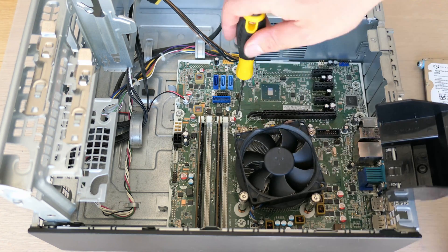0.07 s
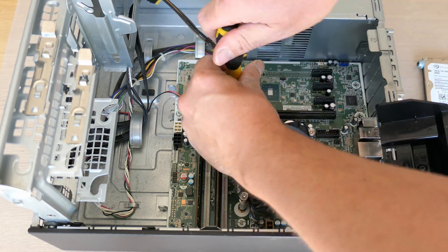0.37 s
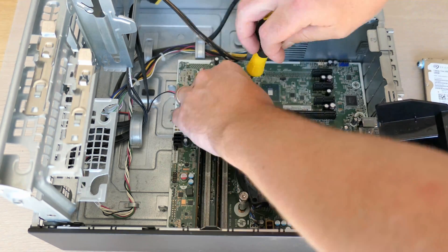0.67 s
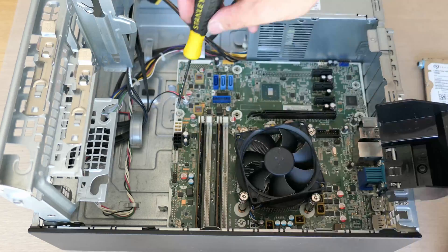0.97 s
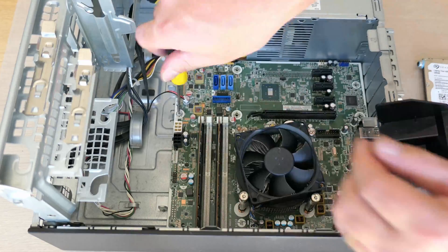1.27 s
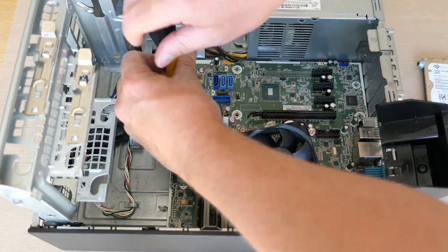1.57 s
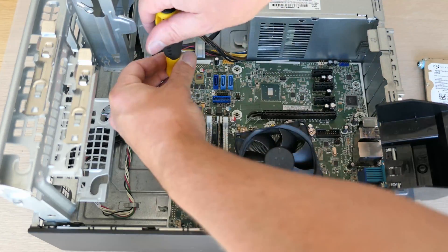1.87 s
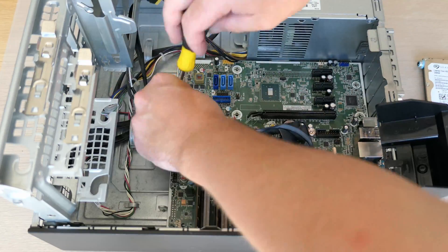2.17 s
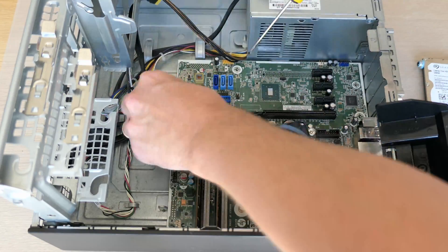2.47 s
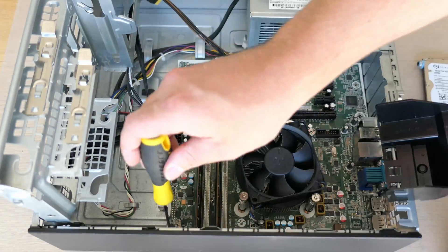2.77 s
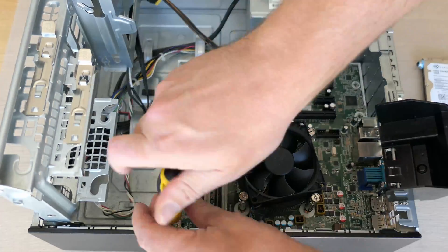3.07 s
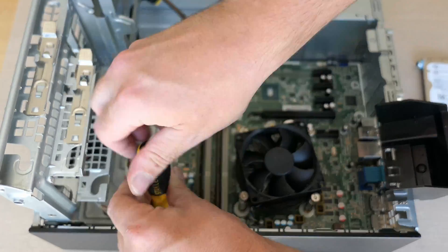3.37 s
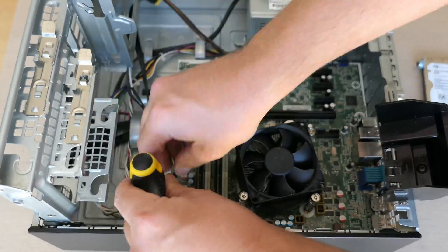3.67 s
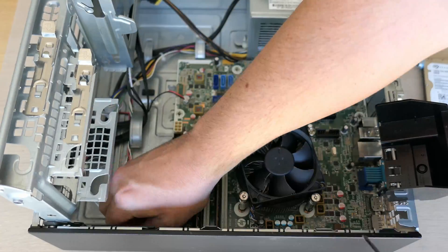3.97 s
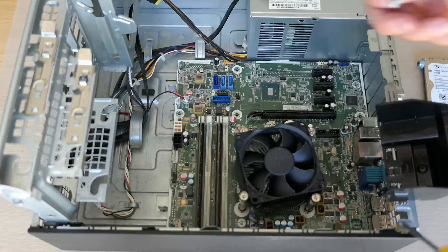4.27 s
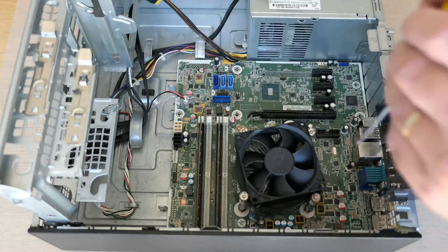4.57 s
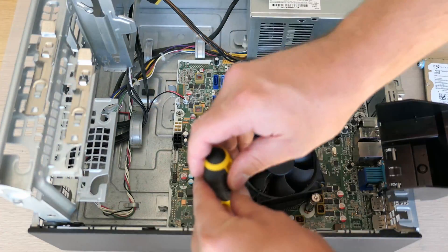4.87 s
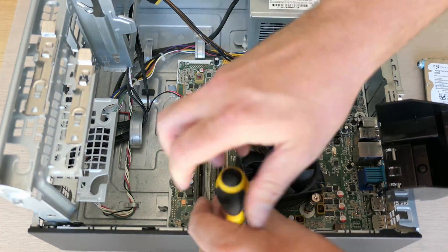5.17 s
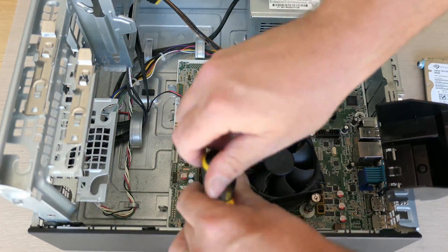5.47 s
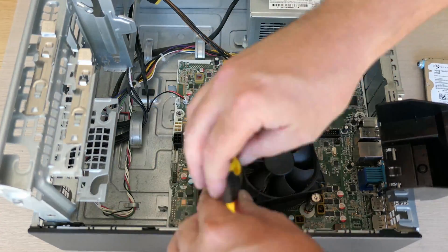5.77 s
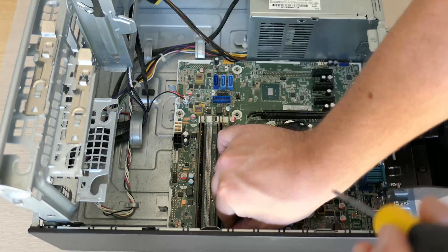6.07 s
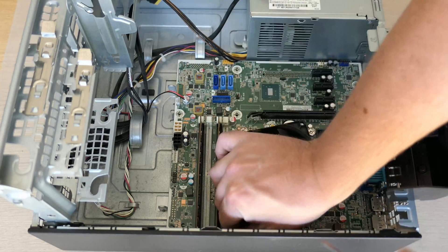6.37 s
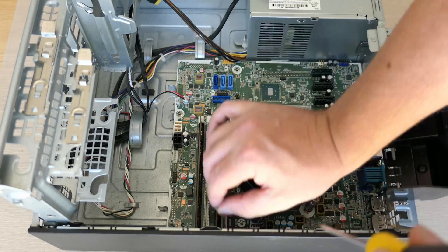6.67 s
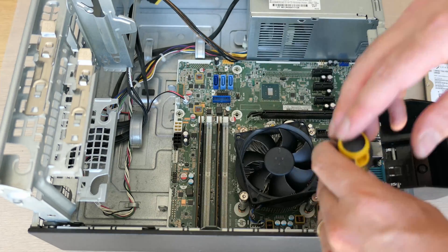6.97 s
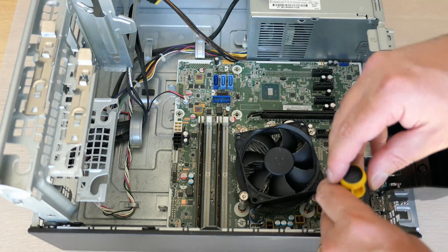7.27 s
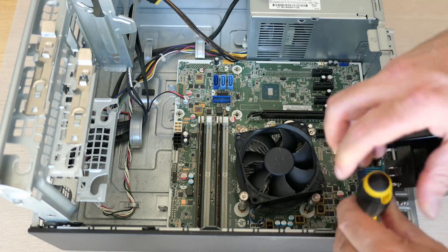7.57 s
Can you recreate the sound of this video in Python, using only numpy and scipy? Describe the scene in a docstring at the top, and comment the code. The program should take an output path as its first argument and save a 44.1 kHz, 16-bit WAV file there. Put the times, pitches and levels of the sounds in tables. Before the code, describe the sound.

A screwdriver works on small screws in an open steel computer case, close to the microphone over a low room hush. From the start its tip scrapes and snaps in a screw head, with sharp clicks around 0.2 and 0.6 seconds. More clicks follow after 1 second, threads rub softly from 1.4, and the loosened circuit board rattles at about 1.6. After another snap at 2 seconds, fingers pick at a loose screw with light ticks. A new run of scrapes and clicks starts near 2.7 seconds and ends in a rattle at 3.7. Following a lull with faint ticks, the tool resumes from 4.5 to 5.8 seconds, with a third rattle at 5.1. Soft rubbing and small ticks follow, and a screw pings faintly at 6.5. From 7.3 seconds the tip scrapes and clicks sharply on the last screw.

```python
"""A quiet room, the camera's stereo microphone close to an open steel computer case. Over a low hush a
screwdriver backs five small screws out of the board. Its tip scrapes and snaps in the first head, each
touch a cluster of tiny impacts sounding through board and case; then fingers pick at loose parts with
bright ticks. From 1.4 s threads rub, and three times the freed board rattles. At 6.5 s a loose screw
pings, and the tip moves on to the last head."""
import sys
import numpy as np
from scipy import signal
from scipy.fft import rfft, irfft, next_fast_len
from scipy.io import wavfile
from scipy.ndimage import uniform_filter1d, map_coordinates

SR = 44100
rng = np.random.default_rng(int(sys.argv[2]) if len(sys.argv) > 2 else 0)


def int16_out(signal):
    """Quantize to a 16-bit WAV file."""
    q = np.round(np.clip(np.atleast_2d(signal).T, -1, 1) * 32767)
    wavfile.write(sys.argv[1], SR, q.astype(np.int16))


N = 335601

# room background, as a spectral density: freq_hz, level_db
HUSH_SPECTRUM = [(25, -39.5), (80, -23), (140, -5.5), (400, -5.5), (900, -12.5), (1300, -17), (3500, -31),
                 (12000, -31.5), (16000, -45)]
# likeness of that background in left and right: freq_hz, correlation
HUSH_LIKENESS = [(100, 0.71), (4000, 0.097)]
# the room's decay: freq_hz, t60_s
ROOM_DECAY = [(150, .38), (1000, 0.22), (14000, 0.27)]
# the room's answer at the microphone: freq_hz, level_db
ROOM_LEVEL = [(150, -1.5), (1000, -6), (14000, -14)]
# modes of board and case: pitch_hz, width_hz, then drive_db from each of the five screws
CASE_MODES = [(142, 8.5, -6, -1, -4, -5, 6.5), (217, 50, -4.5, -6.5, -3.5, -8, -3),
              (321.9, 30, -0.5, 0, 4.5, 3.5, -5.5), (436, 31, -20.5, 0, -11, -23, 2),
              (589, 92, -3, -9, -6, -5.5, -6), (759, 55, -3.5, -1, -4, -2.5, -9),
              (907, 71, 3, 3.5, 3, 2, 6), (1054, 168, 4.5, 0.5, 4, 0, -4),
              (1390, 64, -44.5, -3.5, -15, -6, 1.5), (1674, 26, -1, -31.5, -3, -12.5, -37),
              (1895, 49, 0, -11.5, -9, -1, 0), (2170, 430, 2, -6.5, -12, -4, -2),
              (2972, 16, 5, -34.5, -6.5, -15, -36), (3750, 1300, 0, -15.5, -11.5, -13, -6.5),
              (5420, 1500, -6, -10, -4, -5, -4), (8000, 2100, -7.5, -9, -9, -8.5, -6.5)]
# stereo side signal off the case walls: freq_hz, level_db
WALL_SPREAD = [(200, -4.5), (4000, -11.5)]
# the panels radiate more to the right: freq_hz, left_minus_right_db
PANEL_LEAN = [(300, -3), (3000, -0.5)]
# where a touch's thud, middle, clack and tick lie: freq_hz
COLOUR_BANDS_HZ = (300, 1000, 3000, 13000)
# the tool moves on to the next screw: start_s
NEXT_SCREW_S = (1, 2.6, 4.6, 7)
# the five screws: clack_db, ring_db, left_minus_right_db
SCREW_VOICES = [(-14, 5, -0.5), (-5.5, 6.5, 0.5), (3.5, 6, 1.5), (-3, 5.5, 1), (-1.5, 11.5, .5)]
# tip and head ring together, one note a screw: pitch_hz
HEAD_PITCH_HZ = (8800, 2480, 2400, 1750, 9800)
# tip dragging over a head: start_s, level_db, swell_s, thud_db, bright_db
TIP_SCRAPES = [(0.012, 3, 0.024, -5.5, 16), (0.073, 10.5, 0.014, 1.5, -3.5), (.336, -9, 0.013, -12, -3),
               (0.454, -16.5, 0.0074, 6, 5), (0.535, 1, 0.024, 2, 23.5), (.614, 5, 0.012, -0.5, -2),
               (0.697, -4.5, 0.00079, -14, 7), (1.093, 6.5, 0.0024, -5.5, -9.5),
               (1.225, 6.5, 0.012, -1.5, 13), (1.866, -6.5, 0.014, -1, 12), (2.022, -4, 0.015, 16.5, 16),
               (2.733, -18, 0.012, 6, -6.5), (2.868, -0.5, 0.0076, 6.5, -18), (2.985, -3.5, 0.012, 7, -56),
               (3.163, -4.5, 0.0062, -3.5, 5.5), (3.272, 10, 0.01, 6, -14), (3.39, -2, 0.017, 11.5, -12),
               (3.457, -7, 0.0074, 4, -19), (3.541, 10.5, 0.011, -1.5, -1.5), (3.629, 6, 0.0054, 7, 10),
               (4.468, -3, 0.023, -3, 10), (4.715, -12.5, 0.013, -8, 25), (4.79, 6.5, 0.011, -4, 9),
               (4.907, 4.5, 0.0027, -6.5, -11), (4.964, 10, 0.0064, -4, 2.5), (5.298, 6.5, 0.011, 4.5, -24),
               (5.323, 1, .011, -0.5, -22), (5.438, -2, 0.0079, -1.5, -4), (5.545, 18.5, 0.02, 0.5, -11),
               (7.337, 0, 0.019, 1, 13.5), (7.371, 0.5, 0.01, 4.5, -5)]
# shaft in the fingers, as a spectral density: freq_hz, level_db
SHAFT_SPECTRUM = [(500, 1.5), (5000, -4), (15000, -15.5)]
# tip snapping against a head: start_s, level_db, swell_s, thud_db, bright_db
TIP_CLICKS = [(0.1931, 16.5, 0.0023, -10.5, -13), (.214, -0.5, 0.006, 10.5, 0),
              (0.555, 18, 0.0015, -17.5, -44.5), (1.147, 13, 0.0077, -17, -6.5),
              (1.208, 8, 0.0054, -14, 17), (1.273, 5.5, 0.0059, -3, -7.5), (1.334, 0.5, 0.0055, -2, -4.5),
              (1.915, -3, 0.0049, 6, 3), (1.993, 15.5, 0.019, -6.5, -2), (2.092, 3, 0.016, -9.5, 6.5),
              (2.837, -1, 0.0066, -21, 5), (3.366, -6, 0.012, 3.5, 3), (3.431, 3, .006, 2, 5.5),
              (3.664, 11, 0.0043, 2.5, 11), (3.679, 9.5, 0.0012, -8, 22.5), (5.041, 12, 0.0035, -7, 6.5),
              (5.108, 13, 0.00062, 4, 17), (5.565, 7.5, 0.0018, 8.5, 12), (5.592, 7.5, 0.0042, 3.5, 9.5),
              (5.649, 2.5, .004, 7.5, 9.5), (5.766, -1, 0.0071, 9.5, 13.5), (7.298, 2.5, 0.0095, -2, -20),
              (7.466, 18.5, 0.0033, -9.5, 5.5), (7.555, 20, 0.0027, -11, -5.5)]
# fingers on a loose screw: start_s, level_db, swell_s, clack_db, tick_db, ring_hz
FINGER_TICKS = [(0.787, -13.5, .0026, 3.5, 13.5, 9000), (0.806, -0.5, 0.0062, -2.5, -15, 1670),
                (2.211, -19.5, 0.0036, 20, 2, 6160), (2.225, -22.5, 0.01, 11, 13, 5600),
                (2.278, -23, 0.0058, 20.5, -1, 7100), (2.437, -0.5, .001, -1, 9, 11000),
                (3.891, -18.5, 0.011, 18.5, 5.5, 9600), (3.98, -26.5, 0.0095, 19.5, -15, 4500),
                (4.305, -29, 0.0012, 3, -8, 1254), (5.861, -19.5, 0.0077, 2, -6.5, 2860),
                (6.196, -18, 0.012, 9, 14, 2055), (6.266, -29, .003, 17, 18, 8700),
                (6.32, -24.5, 0.003, 14, -5, 2800), (6.436, -26, 0.012, 14.5, -16, 2640),
                (6.505, -11.5, 0.0052, 7, -18, 5400), (6.625, -27, 0.0067, 16, -15, 2730),
                (6.726, -34.5, 0.0046, 13, 16.5, 9300)]
# thread and fingers rubbing: start_s, level_db, t60_s, bright_db
THREAD_RUBS = [(1.356, -11, 0.33, 3), (1.488, -5.5, 0.26, 18), (3.496, -19.5, 0.13, 16),
               (5.252, -4, 0.78, 12), (5.668, -11, 0.16, 15.5), (6.037, -19.5, 1, 26),
               (6.675, -20, 0.26, 19.5)]
# the freed board: start_s, level_db, swell_s, t60_s, clack_db, tick_db, ring_hz
BOARD_RATTLES = [(1.563, 9, 0.00062, 0.093, 11.5, -4, 3050), (1.568, 10.5, 0.033, 0.11, 8.5, -33.5, 7170),
                 (3.685, 6, 0.017, 0.21, 10, -6, 1876), (5.117, 15, 0.016, 0.24, -2.5, -26.5, 1485)]
# a loose screw ringing on: start_s, level_db
SCREW_PINGS = [(7.6, -57), (6.512, -38.5)]
# modes of a loose screw: pitch_hz, level_db
PING_MODES = [(5300, -8), (5530, -5), (6250, -6), (6450, 0), (7400, -8)]


def amp(db):
    """Decibels to gain."""
    return 10 ** (np.asarray(db) / 20)


def along(points, hz):
    """(freq_hz, value) points read on a log axis."""
    freqs, values = np.transpose(points)
    return np.interp(np.log(hz + 1), np.log(freqs + 1), values)


def filtered(x, response):
    """x through a frequency response."""
    size = next_fast_len(N + SR // 2)
    return irfft(rfft(x, size) * response(np.fft.rfftfreq(size, 1 / SR)), size)[..., :N]


def causal(gain):
    """The response with this gain that rings only after the blow."""
    cepstrum = irfft(np.log(np.maximum(gain, 1e-6)))
    half = len(cepstrum) // 2
    cepstrum[1:half] *= 2
    cepstrum[half + 1:] = 0
    return np.exp(rfft(cepstrum))


def add(track, start_s, sound):
    """Mix a sound into the track."""
    part = track[:, max(round(start_s * SR), 0):][:, :sound.shape[-1]]
    part += sound[:, :part.shape[-1]]


def evened(x, width_hz):
    """Spectrum of x with its broad humps levelled: energy 1, the fine ripple stays."""
    spectrum = rfft(x)
    humps = uniform_filter1d(np.abs(spectrum) ** 2, int(width_hz * len(x) / SR) + 1)
    return spectrum * causal(np.abs(humps) ** -.5)


def wobble(t, per_s):
    """A smooth random curve with per_s knots a second."""
    return map_coordinates(rng.standard_normal(size=1024), [t * per_s])


def room_hush(db):
    """Low room noise under the microphone's hiss, wider in the treble."""
    def mid_and_side(hz):
        angle = np.arccos(np.clip(along(HUSH_LIKENESS, hz), -1, 1)) / 2
        return amp(along(HUSH_SPECTRUM, hz)) * [np.cos(angle), np.sin(angle)]
    mid, side = filtered(rng.standard_normal((2, N)), mid_and_side)
    return amp(db) * np.array([mid + side, mid - side]) / np.std(mid)


def impacts(size, per_s):
    """Randomly timed tiny impacts, rms 1."""
    return (rng.random(size) < per_s / SR) * rng.standard_normal(size) * np.sqrt(SR / per_s)


def metal_contact(t, swell_s, t60_s, rub=0.75, chatter_db=2):
    """Metal catching on metal: tiny impacts over a fine rub, swelling, chattering and dying."""
    envelope = np.minimum(t / max(swell_s, 1 / SR), 1) * amp(-60 * np.maximum(t - swell_s, 0) / t60_s)
    chatter = amp(chatter_db * wobble(t, per_s=200))
    return envelope * chatter * (impacts(len(t), per_s=3000) + rub * rng.standard_normal(len(t)))


def resonance(hz, centre_hz, width_hz):
    """One damped mode, gain 1 at its centre."""
    return 1j * hz * width_hz / (centre_hz ** 2 - hz * hz + 1j * hz * width_hz)


def scatter(t, t60_s, width_hz):
    """Spectrum of a short spray of reflections, energy 1."""
    return evened(rng.standard_normal(len(t)) * amp(-60 * t / t60_s), width_hz)


def room_tail(size, onset_s=0.0013):
    """Stereo reverberation; each frequency dies at its own speed."""
    hz, t, noise = signal.stft(rng.standard_normal((2, size)), SR, nperseg=256)
    t60 = along(ROOM_DECAY, hz)[:, None]
    decay = amp(along(ROOM_LEVEL, hz)[:, None] - 60 * t / t60)
    equal_energy = np.sqrt(np.log(10 ** 6) / (t60 * SR))
    onset = 1 - np.exp(-t / onset_s)
    return signal.istft(noise * decay * equal_energy * onset, SR, nperseg=256)[1][:, :size]


def panel_radiation(hz, low_hz=119, high_hz=13700):
    """Small panels radiate little bass and favour the right; no contact is hard enough for the very top."""
    u = 1j * hz / low_hz
    bass_cut = u ** 3 / ((1 + u) * (1 + u + u * u))
    lean = amp(along(PANEL_LEAN, hz) * [[.5], [-.5]])
    return bass_cut * lean / np.sqrt(1 + (hz / high_hz) ** 8)


def through_case(touches, size=16384, direct_db=-13, ring_q=18):
    """Each touch has its own hardness and ring, spreads through the case and fades in the room."""
    out = np.zeros((2, N))
    t, hz = np.arange(size) / SR, np.fft.rfftfreq(size, 1 / SR)
    modes = np.array([resonance(hz, *row[:2]) for row in CASE_MODES])
    for start_s, db, swell_s, t60_s, thud_db, clack_db, tick_db, ring_hz in touches:
        screw = np.searchsorted(NEXT_SCREW_S, start_s)
        _, ring_db, pan_db = SCREW_VOICES[screw]
        force = evened(metal_contact(t, swell_s, t60_s), width_hz=400)
        hardness = amp(np.interp(np.sqrt(hz), np.sqrt(COLOUR_BANDS_HZ), (thud_db, 0, clack_db, tick_db)))
        ring = np.hypot(1, amp(ring_db) * np.abs(resonance(hz, ring_hz, ring_hz / ring_q)))
        # the place sets how strongly each mode is driven, the direction of the push its sign
        drive = amp(np.array(CASE_MODES)[:, 2 + screw])
        body = (drive * rng.choice([-1, 1], len(modes))) @ modes + amp(direct_db)
        # bending waves in the sheet smear every impact
        sheet = scatter(t, t60_s=.006, width_hz=640)
        # reflections inside the case reach left and right differently
        walls = scatter(t, t60_s=0.011, width_hz=410) * amp(along(WALL_SPREAD, hz))
        near = causal(hardness * ring) * body * sheet * np.array([1 + walls, 1 - walls])
        # the room gathers the power of all panels, so its answer is smooth
        power = drive ** 2 @ np.abs(modes) ** 2 + amp(direct_db) ** 2
        far = causal(hardness * np.sqrt(power)) * rfft(room_tail(size))
        gains = amp([[db + pan_db / 2], [db - pan_db / 2]])
        add(out, start_s, gains * irfft(force * (near + far)))
    return filtered(out, panel_radiation)


def tip_colour(start_s, bright_db, tick_db=-24):
    """clack_db, tick_db and ring_hz at the screw in hand: a harder edge lifts the top most."""
    screw = np.searchsorted(NEXT_SCREW_S, start_s)
    return SCREW_VOICES[screw][0] + 0.25 * bright_db, tick_db + bright_db, HEAD_PITCH_HZ[screw]


def tip_scrapes(t60_s=0.081):
    """The tip drags over the head as the grip changes."""
    for start_s, db, swell_s, thud_db, bright_db in TIP_SCRAPES:
        yield start_s, db, swell_s, t60_s, thud_db, *tip_colour(start_s, bright_db)


def shaft_grit(work, db, hold_s):
    """While the hands are busy the shaft rubs faintly in the fingers, in uneven little strokes."""
    busy = np.abs(uniform_filter1d(work[0] ** 2, int(hold_s * SR)))
    strokes = map_coordinates(rng.standard_normal(N // 1000), [np.arange(N) * 30 / SR])  # 30 knots a second
    grains = impacts(N, per_s=6000) + .7 * rng.standard_normal((2, N))
    friction = filtered(grains, lambda hz: amp(along(SHAFT_SPECTRUM, hz)))
    return amp(db + 2.5 * strokes) * (busy / busy.max()) ** 0.17 * friction


def tip_clicks(t60_s=0.024):
    """The tip snaps against the head and stops dead."""
    for start_s, db, swell_s, thud_db, bright_db in TIP_CLICKS:
        yield start_s, db, swell_s, t60_s, thud_db, *tip_colour(start_s, bright_db)


def finger_ticks(sharpest_t60_s=0.018, drag=4, thud_db=-7.5):
    """Fingers pick up a loose screw; a slower touch also fades more slowly."""
    for start_s, db, swell_s, *colour in FINGER_TICKS:
        yield start_s, db, swell_s, sharpest_t60_s + drag * swell_s, thud_db, *colour


def thread_rubs(swell_s=.018, thud_db=11.5):
    """Thread and fingers rub slowly on the board."""
    for start_s, db, t60_s, bright_db in THREAD_RUBS:
        yield start_s, db, swell_s, t60_s, thud_db, *tip_colour(start_s, bright_db)


def board_rattles(thud_db=-0.5):
    """A screw leaves its thread and the freed board rattles."""
    for start_s, db, swell_s, t60_s, *colour in BOARD_RATTLES:
        yield start_s, db, swell_s, t60_s, thud_db, *colour


def screw_pings(t60_s=0.075, waver_cycles=0.18):
    """A screw, briefly free of the fingers, rings unsteadily at a few high notes."""
    out, t = np.zeros((2, N)), np.arange(SR // 2) / SR
    for start_s, db in SCREW_PINGS:
        for hz, mode_db in PING_MODES:
            cycles = hz * t + rng.random((2, 1)) / 2 + waver_cycles * wobble(t, per_s=500)
            envelope = amp(db + mode_db - 60 * t / t60_s) * np.minimum(t * hz / 10, 1)
            add(out, start_s, envelope * np.sin(2 * np.pi * cycles))
    return out


def scene():
    """The work on the case, close up, with the room behind it."""
    work = through_case([*tip_clicks(), *tip_scrapes(), *thread_rubs(), *board_rattles(), *finger_ticks()])
    return work + screw_pings() + shaft_grit(work, db=-56.5, hold_s=0.073) + room_hush(db=-66.0)


def record(dry):
    """The camera keeps nothing above its band limit."""
    top_hz = 15700
    return filtered(dry, lambda hz: 1 / np.sqrt(1 + (hz / top_hz) ** 160))


dry = scene()
out = record(dry)
int16_out(out)
```